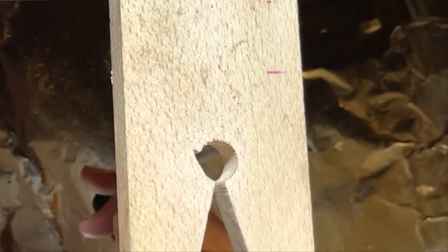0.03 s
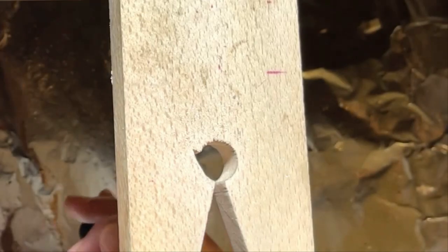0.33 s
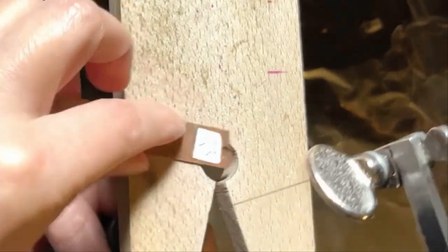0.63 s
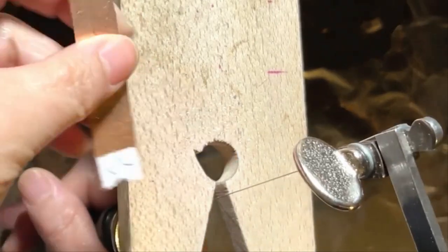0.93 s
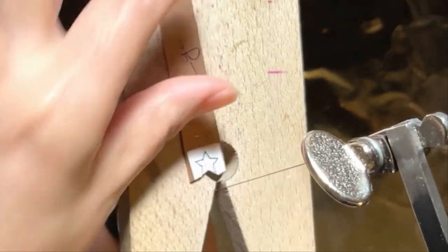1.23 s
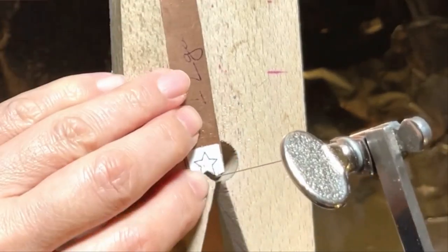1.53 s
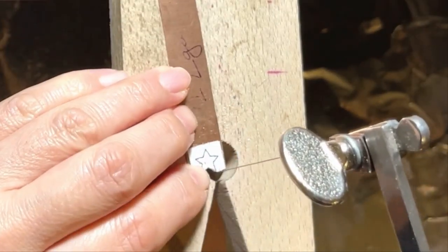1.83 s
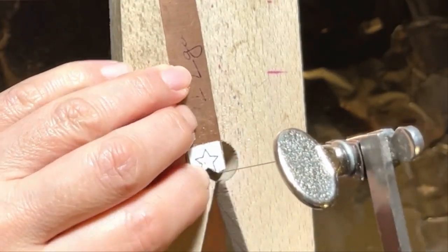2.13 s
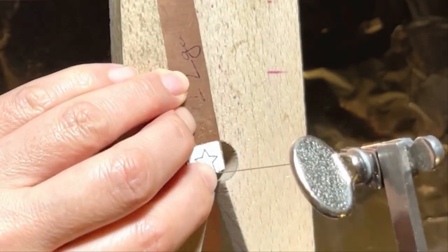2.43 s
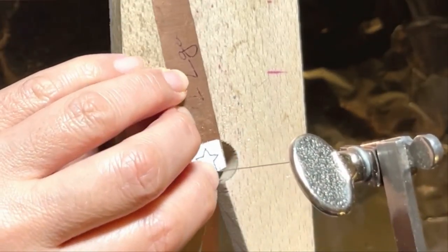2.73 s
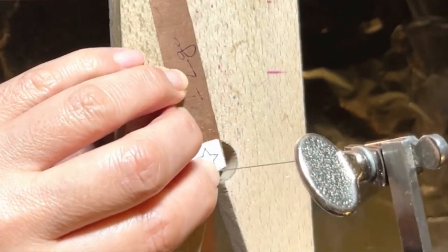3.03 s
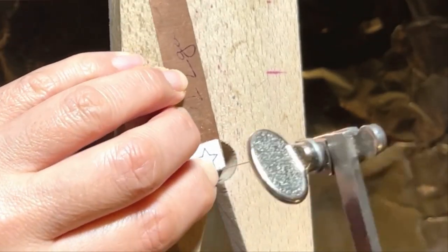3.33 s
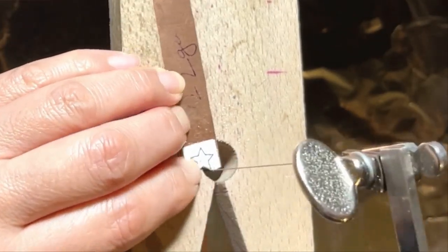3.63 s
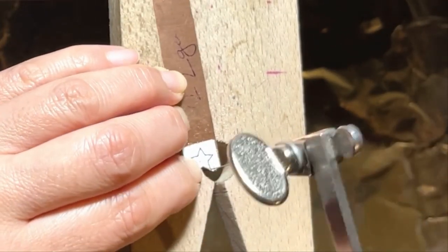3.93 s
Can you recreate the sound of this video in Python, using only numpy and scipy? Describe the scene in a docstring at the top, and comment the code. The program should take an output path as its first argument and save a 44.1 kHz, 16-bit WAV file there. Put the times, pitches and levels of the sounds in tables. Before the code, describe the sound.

A fine saw rasps through a metal strip in short, quick strokes from about 3.3 to 4 seconds. Before that, soft wooden knocks, ticks and rustles of handling fill the first second. The strip slides on wood and snaps down sharply at 1.3 seconds, then the blade tinks faintly between 1.7 and 2.4. Everything is close and slightly left, in a small room with low machine hum and faint hiss.

```python
"""A jeweller's bench in a small room, heard close up on a stereo pair, the work a little to the left.
Over a low machine hum and a faint hiss, a metal strip is handled, laid on the wooden bench pin,
slid into place and snapped down flat. The taut saw blade tinks on its edge, then rasps in short
strokes: the teeth ring the blade and shake the strip and the pin."""
import sys
import numpy as np
from scipy import signal
from scipy.fft import rfft, irfft, next_fast_len
from scipy.io import wavfile
from scipy.ndimage import map_coordinates

SR = 44100
rng = np.random.default_rng(int(sys.argv[2]) if len(sys.argv) > 2 else 0)


def wrap_up_sound(samples):
    """Save the sound to the file named by the first command line argument, as 16-bit audio."""
    columns = np.atleast_2d(samples).T
    # keep every value between -1 and 1, then stretch to whole-number steps
    tamed = np.clip(columns, -1, 1)
    steps = np.round(tamed * 32767).astype(np.int16)
    wavfile.write(sys.argv[1], SR, steps)


N = 176400


def amp(db):
    """Decibels to gain."""
    return 10 ** (np.asarray(db) / 20)


def unit(x):
    """Scale to rms 1."""
    return x / np.sqrt(np.mean(x ** 2) + 1e-20)


def along(points, hz):
    """Read (f/Hz, value) points on a log frequency axis."""
    f, v = np.transpose(points)
    return np.interp(np.log(hz + 1), np.log(f + 1), v)


def tone(points):
    """Gain curve through (f/Hz, level/dB) points."""
    return lambda f: amp(along(points, f))


def resonant(modes):
    """Gain curve of (f/Hz, width/Hz, level/dB) resonances, summed in power."""
    return lambda f: np.sqrt(sum(abs(amp(db) * f * w / (c * c - f * f + 1j * f * w)) ** 2
                                 for c, w, db in modes))


def sharp(modes):
    """Gain curve of such resonances with deep valleys between them."""
    return lambda f: sum(amp(db) / (1 + ((c * c - f * f) / (np.maximum(f, 1) * w)) ** 2)
                         for c, w, db in modes)


def colour(x, gain, size=8192):
    """Causal filter of unit energy: only the shape of the gain curve counts."""
    cepstrum = irfft(np.log(np.maximum(gain(np.fft.rfftfreq(size, 1 / SR)), 1e-6)))
    cepstrum[1:size // 2] *= 2
    cepstrum[size // 2 + 1:] = 0
    impulse = irfft(np.exp(rfft(cepstrum)))
    return signal.fftconvolve(x, impulse / np.linalg.norm(impulse))


def filtered(x, gain):
    """Zero-phase filter."""
    m = next_fast_len(N + SR // 2)
    return irfft(rfft(x, m) * gain(np.fft.rfftfreq(m, 1 / SR)), m)[..., :N]


def add(out, start, x):
    """Mix x in at a start time in seconds."""
    part = out[max(0, round(start * SR)):][:len(x)]
    part += x[:len(part)]


def wobble(hz):
    """A smooth random curve."""
    return map_coordinates(rng.standard_normal(int(N * hz / SR) + 4), [np.arange(N) * hz / SR])


def hand_speed(length, peak):
    """A hand moves up from rest, is fastest at the share `peak` of its time, and stops."""
    u = np.linspace(0, 1, int(length * SR))
    return np.abs(np.sin(np.pi * np.interp(u, [0, np.clip(peak, .05, .95), 1], [0, .5, 1])))


def burst(t60):
    """The dying chatter of one contact."""
    t = np.arange(SR // 5) / SR
    return rng.standard_normal(len(t)) * 1000 ** (-t / t60)


def contacts(rows, gain, t60):
    """Contacts (t/s, level/dB) heard through one body."""
    out = np.zeros(N)
    for start, db in rows:
        add(out, start, amp(db) * burst(t60))
    return colour(out, gain)[:N]


def stereo_noise(spectrum, width):
    """Steady noise at both microphones, alike at width 0."""
    mid, side = filtered(rng.standard_normal((2, N)), tone(spectrum))
    return unit(np.array([mid + width * side, mid - width * side]))


# partials of the machine hum; spectra of the rumble and the hiss (f/Hz, level/dB)
HUM_PARTIALS = [(73, -59), (113, -59), (188.4, -59.5), (301.5, -67.5)]
RUMBLE_TONE = [(53, -30.5), (62, 0), (185, -0.5), (250, -13), (720, -22), (2000, -58.5)]
HISS_TONE = [(700, 6), (4000, -0.5), (7000, -8), (9500, -18), (14000, -42.5)]
# fall of the hiss (t/s, relative level/dB)
HISS_FADE = [(.7, -65), (1.28, -69), (1.73, -79), (3.28, -80)]

def room_tone():
    """A wavering machine hum and rumble in the centre, and a wide hiss that sinks away."""
    t = np.arange(N) / SR
    hum = np.zeros(N)
    for hz, db in HUM_PARTIALS:
        waver = 1 + 0.16 * (wobble(hz=7.06) + 1j * wobble(hz=6.3))
        partial = np.exp(2j * np.pi * (hz * t + rng.random()))
        hum += amp(db) * np.sqrt(2) * np.real(waver * partial)
    hiss = amp(6.5 + np.interp(t, *np.transpose(HISS_FADE))) * stereo_noise(HISS_TONE, width=0.94)
    rumble = amp(-56) * stereo_noise(RUMBLE_TONE, width=0.05)
    return hum + rumble + hiss


# faint rustles (t/s, length/s, level/dB, graininess/dB)
RUSTLES = [(0.165, 0.26, -58.5, 5.5), (0.968, 0.55, -68.5, 3), (2.295, 0.17, -64.5, 5.5),
           (3.498, 0.16, -59.5, 2), (3.603, 0.26, -67.5, -0.5)]
# their spectrum (f/Hz, level/dB)
RUSTLE_TONE = [(6500, -6), (10000, -8.5), (14000, -3)]

def rustles():
    """Light, bright friction of handling and of the blade gliding without load."""
    out = np.zeros(N)
    for start, length, db, grain_db in RUSTLES:
        speed = hand_speed(length, peak=0.3)
        grains = unit(rng.standard_normal(N) * amp(grain_db * wobble(hz=300)))[:len(speed)]
        add(out, start, amp(db) * grains * np.sqrt(speed))
    return colour(out, tone(RUSTLE_TONE))[:N]


# soft knocks (t/s, level/dB, tilt/dB per octave)
KNOCKS = [(0.1863, -31, -0.5), (.234, -43.5, 5), (.366, -39.5, 5.5), (.802, -47, -11)]
# spectrum of the knocked wood (f/Hz, level/dB)
KNOCK_TONE = [(120, -12.5), (520, 8.5), (950, 2.5), (2100, -17), (3000, -31.5)]

def knocks():
    """Dull bumps on the wood, each with its own brightness."""
    out = np.zeros(N)
    for start, db, tilt in KNOCKS:
        wood = lambda f: amp(along(KNOCK_TONE, f) + tilt * np.log2(np.maximum(f, 300)))
        add(out, start, amp(db) * colour(burst(t60=0.044), wood))
    return out


# handling ticks (t/s, level/dB)
TICKS = [(.1995, -38.5), (.2815, -57), (.3305, -38.5), (.3695, -36), (.384, -43.5), (.532, -41),
         (.5455, -41.5), (.7255, -41)]
# their spectrum (f/Hz, level/dB)
TICK_TONE = [(1000, -11), (8000, -15), (14500, -6)]

def ticks():
    """Small, dry contacts as the strip is handled."""
    return contacts(TICKS, tone(TICK_TONE), t60=0.02)


# the strip meets the pin (t/s, level/dB)
TOUCHES = [(.577, -39), (.834, -52.5), (1.098, -50), (2.257, -53), (2.41, -56.5)]
# spectrum of the strip on wood (f/Hz, level/dB)
TOUCH_TONE = [(200, -25.5), (400, -6.5), (1000, -6.5), (1500, -2.5), (2400, -30.5), (4500, -24),
              (6600, -11), (8800, -33)]

def touches():
    """The metal strip taps lightly on the wooden pin."""
    return contacts(TOUCHES, tone(TOUCH_TONE), t60=0.074)


# pushes of the strip (t/s, length/s, scrape level/dB, squeak level/dB)
SLIDES = [(0.597, 0.25, -60.5, -96), (1.078, 0.13, -62, -84), (1.163, 0.13, -52.5, -60.5),
          (1.386, 0.08, -59, -54.5), (1.49, 0.041, -60.5, -55.5)]
# modes of the bench pin, also shaken by the saw (f/Hz, width/Hz, level/dB)
PIN_MODES = [(157, 68, -5.5), (345.7, 65, 0.5), (394, 44, 0), (503.5, 84, -11.5), (751, 82, -2),
             (907, 77, -6.5)]
# resonances of the squeak (f/Hz, level/dB)
SQUEAK_MODES = [(3550, -11.5), (6800, 0), (11300, -7.5), (14400, -15)]

def slides(squeak_width_hz=770):
    """Grainy friction of the strip on the pin, with a thin metallic squeak."""
    on_wood = lambda f: tone(TOUCH_TONE)(f) + amp(2) * sharp(PIN_MODES)(f)
    squeak = sharp([(hz, squeak_width_hz, db) for hz, db in SQUEAK_MODES])
    out = np.zeros(N)
    for start, length, scrape_db, squeak_db in SLIDES:
        speed = hand_speed(length, peak=0.66)
        rub = unit(rng.standard_normal(N) * amp(3.3 * wobble(hz=150)))[:len(speed)] * speed
        add(out, start, amp(scrape_db) * colour(rub, on_wood))
        add(out, start, amp(squeak_db) * colour(rub, squeak))
    return out


# the strip lands (t/s, level/dB)
CLACKS = [(1.2793, -22.5), (1.2817, -26.5)]
# spectrum of the impact (f/Hz, level/dB)
CLACK_TONE = [(120, -39.5), (200, -7), (1180, -12.5), (2170, -13.5), (2960, -20.5), (5730, -3.5),
              (12600, -15), (16000, -8.5)]
# modes of strip and pin together (f/Hz, width/Hz, level/dB)
CLACK_MODES = [(394, 75, -3), (1188, 55, -6.5), (2130, 140, -12), (5880, 810, -12)]

def clack(ring_db=-31.5):
    """The strip snaps down flat in two quick contacts and buzzes briefly with the pin."""
    ring = contacts([(CLACKS[-1][0], ring_db)], resonant(CLACK_MODES), t60=0.056)
    return contacts(CLACKS, tone(CLACK_TONE), t60=0.019) + ring


def teeth(speed, peak_teeth_per_s=1100, spread_db=2.5, drag_share=0.19):
    """Force of uneven tooth catches, faster with the stroke, over smooth drag."""
    scatter, size = rng.standard_normal((2, 600))
    drag = rng.standard_normal(SR // 4)[:len(speed)]
    teeth_passed = np.cumsum(np.sqrt(speed)) * peak_teeth_per_s / SR
    catches = np.searchsorted(teeth_passed, np.arange(len(size)) + 0.25 * scatter)
    bites = np.bincount(catches, amp(spread_db * np.clip(size, -2, 2)), len(speed) + 1)[:len(speed)]
    return unit(unit(bites - bites.mean()) + drag_share * drag)


# the blade meets the strip (t/s, length/s, level/dB)
TINKS = [(1.71, 0.029, -60), (1.926, 0.051, -71), (1.984, 0.038, -66), (2.31, 0.02, -66),
         (2.343, 0.014, -50)]
# modes of the taut blade (f/Hz, level/dB)
TINK_MODES = [(3900, -0.5), (7750, 2), (8550, -1.5), (11700, -6.5), (15200, -5)]

def tinks(width_hz=260):
    """Teeth scratch briefly over the strip's edge and ring the taut blade."""
    out = np.zeros(N)
    for start, length, db in TINKS:
        speed = hand_speed(length, peak=0.35)
        add(out, start, amp(db) * teeth(speed) * np.sqrt(speed))
    return colour(out, sharp([(hz, width_hz, db) for hz, db in TINK_MODES]))[:N]


def steel_ring(bites, t60=0.003):
    """Each bite sets off its own brief ring in the dense modes of the steel."""
    decay = amp(-60 * np.arange(SR // 50) / SR / t60) ** 2
    energy = np.abs(signal.fftconvolve(bites ** 2, decay / decay.sum()))
    return np.sqrt(energy) * rng.standard_normal(SR // 2)[:len(energy)]


def sweeping_comb(ring, delay_s=0.00103, growth=0.12, gain=0.4):
    """A short, slowly growing delay gives the rasp a shifting, ringing colour."""
    n = np.arange(len(ring))
    delay = delay_s * SR * (1 + growth * n / len(ring))
    return (ring + gain * map_coordinates(ring, [n - delay])) / np.hypot(1, gain)


# the blade's broad hump at a pitch of 7000 Hz (f/Hz, level/dB)
BLADE_TONE = [(3400, -14), (4700, -9), (6100, -2), (7300, 1.5), (8900, -5.5), (10200, -15), (15000, -39.5)]
# resonances of the steel (f/Hz)
STEEL_MODES = [4800, 5800, 7050, 8500]

def blade(pitch_hz, width_hz=330, mode_db=0.5):
    """Gain curve of the blade: a hump set by the stroke's pitch, over the steel's own resonances."""
    modes = sharp([(hz, width_hz, mode_db) for hz in STEEL_MODES])
    return lambda f: amp(along(BLADE_TONE, f * 7000 / pitch_hz)) * (1 + modes(f))


# saw strokes (t/s, length/s, fastest at share of length, level/dB of pin, strip, blade and
# tooth edges, blade pitch f/Hz, looseness of the strip 0-1)
STROKES = [(3.299, 0.025, 0.38, -39, -53.5, -65.5, -66.5, 6850, 0.5),
           (3.349, 0.097, 0.19, -27, -39, -40.5, -40.5, 7060, 0),
           (3.464, 0.082, 0.49, -32.5, -41.5, -41, -46.5, 6620, 0.06),
           (3.546, 0.047, .3, -38.5, -52, -50, -53.5, 6300, 0.15),
           (3.749, .087, 0.48, -30, -37.5, -32, -37.5, 7200, 0.06),
           (3.839, 0.089, .62, -38, -41, -35.5, -43, 5970, 0.2),
           (3.924, 0.082, 0.49, -30, -32.5, -34, -32, 7300, 1)]
# spectra of the sawn strip and the tooth edges (f/Hz, level/dB)
STRIP_TONE = [(300, -9.5), (600, -2), (1400, -2.5), (2100, -10.5), (3300, -18.5), (9000, -30)]
EDGE_TONE = [(3000, -32), (10500, -4), (12200, -0.5), (14100, -0.5), (15300, 1.5)]

def saw():
    """The teeth drive the pin, the strip and the blade, and crackle at their own edges."""
    out = np.zeros(N)
    for start, length, peak, pin_db, strip_db, blade_db, edge_db, pitch_hz, loose in STROKES:
        speed = hand_speed(length, peak)
        force = teeth(speed)
        wood_drive, metal_drive = force * speed ** 0.74, force * speed ** 0.89
        steel = sweeping_comb(steel_ring(metal_drive))
        # a loosely held strip lowers and damps the pin's modes
        pin = [(hz * (1 - 0.069 * loose), width * (1 + 0.67 * loose), db) for hz, width, db in PIN_MODES]
        add(out, start, amp(pin_db) * colour(wood_drive, sharp(pin)))
        add(out, start, amp(strip_db) * colour(metal_drive, tone(STRIP_TONE)))
        add(out, start, amp(blade_db) * colour(steel, blade(pitch_hz)))
        add(out, start, amp(edge_db) * colour(steel, tone(EDGE_TONE)))
    return out


# decay of the small room (f/Hz, t60/s)
ROOM_DECAY = [(200, 0.31), (15000, 0.15)]
# side signal of its reflections (f/Hz, level/dB)
ROOM_WIDTH = [(800, -15.5), (2200, -4), (5000, -7)]

def room(bench, tail_db=-9.5, early_db=-2.5):
    """Early side echoes and a short tail; the bass is almost alike at both microphones."""
    def reflect(impulse):
        return signal.fftconvolve(np.pad(bench, (40, 0)), impulse / np.linalg.norm(impulse))[:N]
    hz, t, noise = signal.stft(rng.standard_normal((2, SR // 2)), SR, nperseg=256)
    decay = amp(-60 * t / along(ROOM_DECAY, hz)[:, None])
    tail = signal.istft(noise * decay, SR, nperseg=256)[1]
    early = amp(early_db) * reflect(burst(t60=0.041))
    mid = amp(tail_db) * reflect(tail[0])
    side = filtered(amp(tail_db) * reflect(tail[1]) + early, tone(ROOM_WIDTH))
    return np.array([mid + side, mid - side])


# left microphone over right (f/Hz, level/dB)
BALANCE = [(1800, 1.67), (6000, 0.085)]

def scene():
    """The bench close to the microphones and a little to the left, with the room around it."""
    bench = saw() + knocks() + clack() + slides() + tinks() + rustles() + touches() + ticks()
    lean_left = lambda f: amp(np.outer([.5, -.5], along(BALANCE, f)))
    return filtered(bench + room(bench), lean_left) + room_tone()


def record(dry, top_hz=15800):
    """Both microphone channels pass through a steep low-pass."""
    return filtered(dry, lambda f: 1 / np.sqrt(1 + (f / top_hz) ** 160))


dry = scene()
out = record(dry)
wrap_up_sound(out)
```